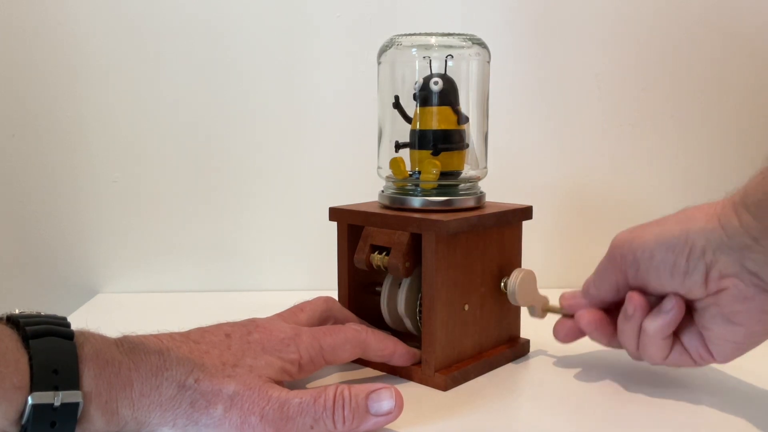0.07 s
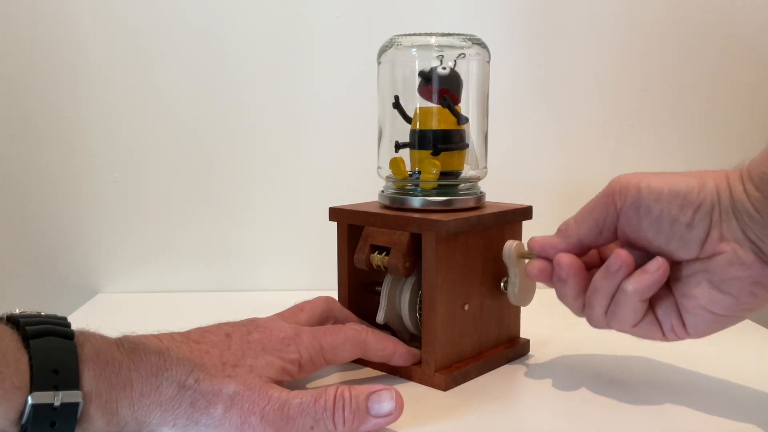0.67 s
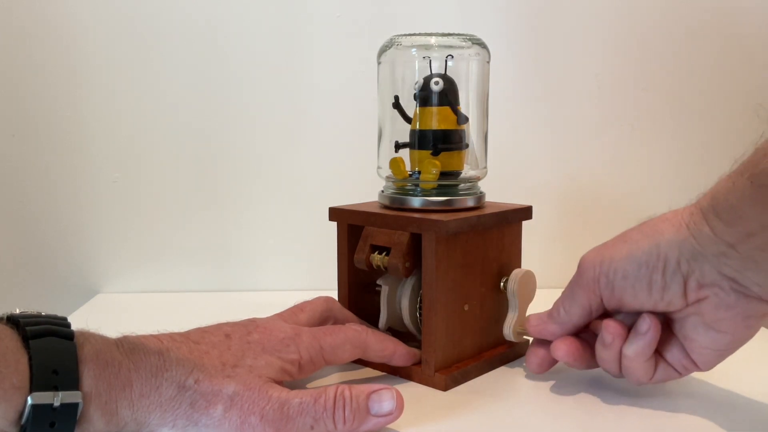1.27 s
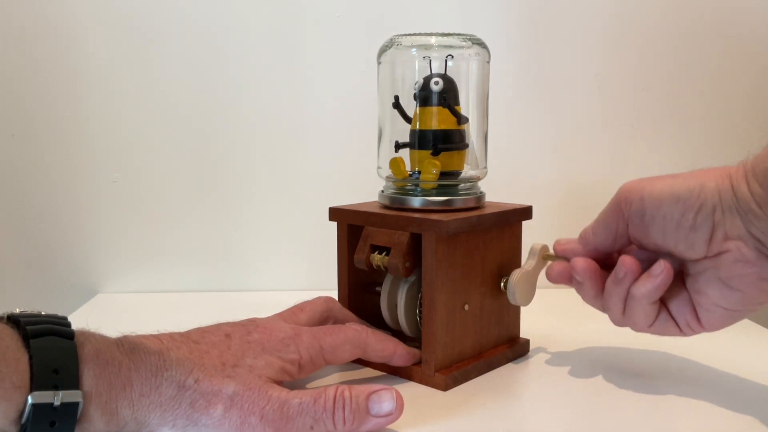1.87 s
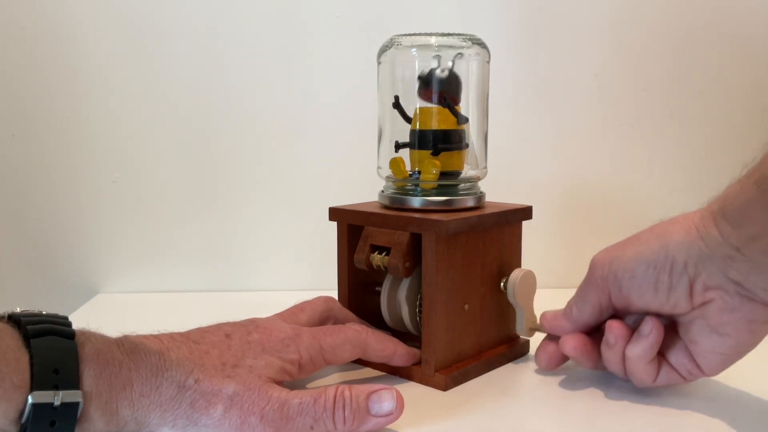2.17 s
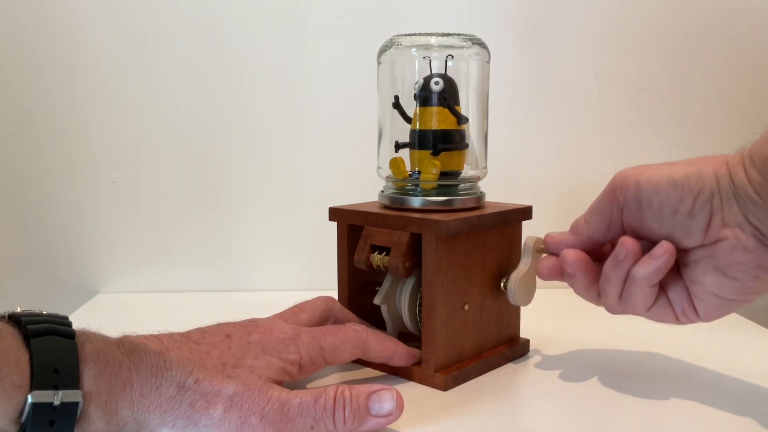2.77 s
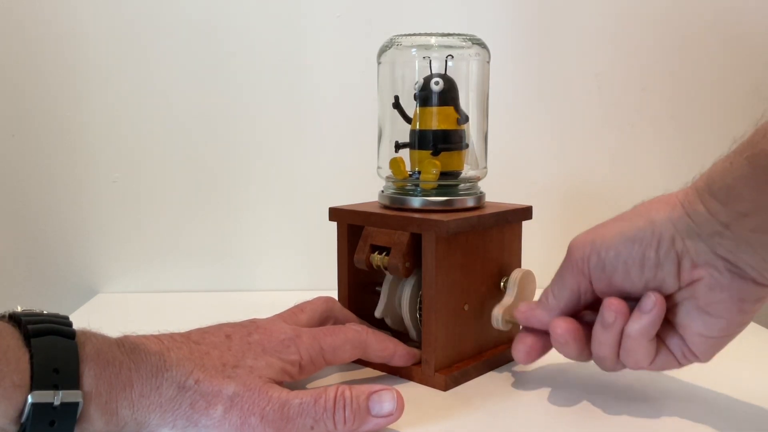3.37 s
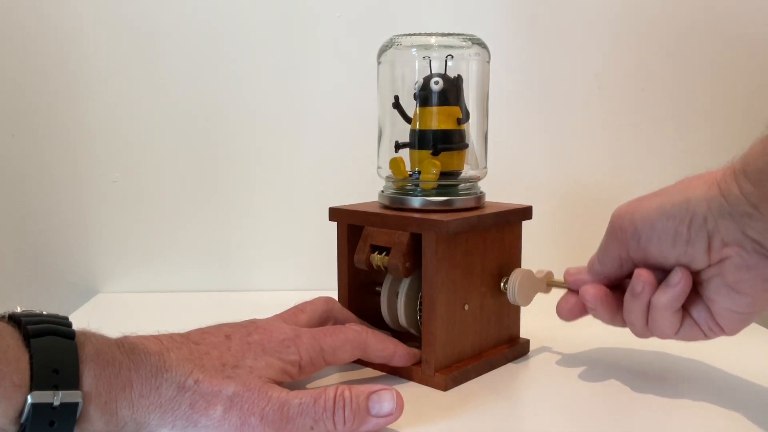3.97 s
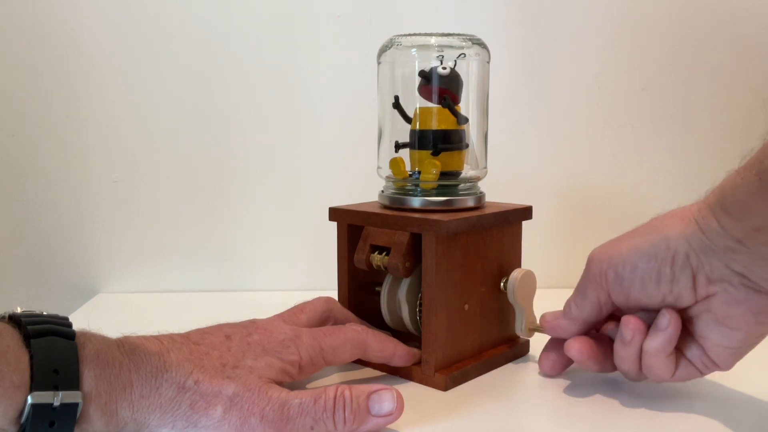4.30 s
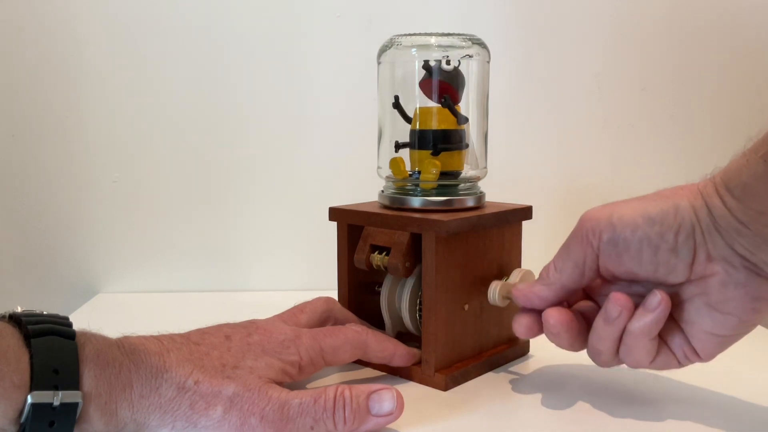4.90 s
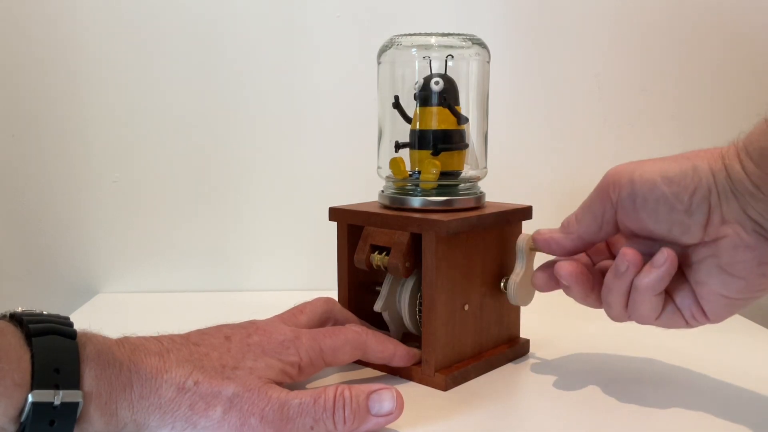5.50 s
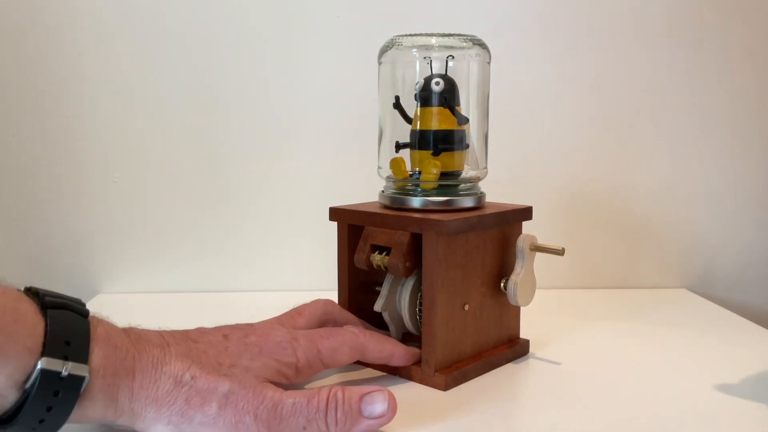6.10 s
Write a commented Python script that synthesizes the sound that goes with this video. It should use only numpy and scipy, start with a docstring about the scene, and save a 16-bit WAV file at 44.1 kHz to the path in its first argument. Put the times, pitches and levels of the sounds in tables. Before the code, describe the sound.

A hand-cranked wooden mechanism clacks in short runs, clinking against a glass jar, with duller claps and soft scraping in between.

```python
"""A table in a small room, one microphone close to a hand-cranked wooden automaton: a toy bee under a
glass jar, on a box of cams. First a follower clacks off its cam, thumping the box, and the bee's arm
strikes the jar. The head lifts with a scrape and claps shut. Twice a run of three clacks and clinks
follows, the shaft rubbing harder on each climb, and each run ends with another lift and clap. Before
the last clap the crank stalls and creeps on; then the hand lets go with a faint rustle."""
import sys
import numpy as np
from scipy import signal
from scipy.fft import rfft, irfft, next_fast_len
from scipy.io import wavfile
from scipy.ndimage import map_coordinates

SR = 44100
rng = np.random.default_rng(int(sys.argv[2]) if len(sys.argv) > 2 else 0)


def log_audio(samples):
    """Write samples as a 16-bit WAV file to the path given in sys.argv[1]."""
    # one column per channel
    frames = np.atleast_2d(samples).T
    # limit to full scale, then quantise
    limited = np.clip(frames, -1, 1)
    pcm = np.round(limited * 32767).astype(np.int16)
    wavfile.write(sys.argv[1], SR, pcm)


N = 275625
T = np.arange(SR // 2) / SR  # time within one blow, s


# followers drop: t/s, level/dB, relative box, wood and tip levels/dB, wood tilt/(dB/octave)
DROPS = [(0.0578, -6.5, -8.5, -15.5, -8, -1.5), (1.3785, -8.5, -6.5, -11.5, -20, 3.5),
         (1.714, -7.5, -7.5, -5, -13, -7), (2.0477, -6, -8.5, -11, -8.5, 6.5),
         (3.3758, -9, -6.5, -8.5, -6.5, 3.5), (3.71, -6.5, -11.5, -12, -6.5, 3),
         (4.0387, -5, -11.5, -12, -10, 9.5)]
# modes of a follower's wooden rod and of its hard tip: f/Hz, level/dB, t60/s
WOOD_MODES = [(1010, -9, .035), (1260, -6, .04), (1320, -11, .03), (2430, -3, .035), (2520, -3, .03),
              (2950, -7, .025), (3280, -10, .025)]
TIP_MODES = [(4150, -3, 0.018), (4840, 3, 0.014), (5400, 0.5, 0.018), (5880, -1, 0.028),
             (7630, -10.5, 0.03), (10800, -24.5, 0.13)]
# spectrum of a hard contact: f/Hz, level/dB
CRACK_SPECTRUM = [(150, -30), (550, -5), (750, -16), (1200, -2), (1900, -6.5), (2500, -3.5), (3700, -7.5),
                  (4600, -3), (5700, -4), (6900, -13.5), (7900, -8.5), (12000, -15), (15500, -21.5),
                  (17000, -40)]
def drops():
    """Followers snap down on the cams: the hard tip rings first, then the wooden rod."""
    out = np.zeros(N)
    for s, db, _, wood_db, tip_db, tilt_db in DROPS:
        crack = amp(-7) * burst(CRACK_SPECTRUM, t60=.034, attack=.00061)
        tip = amp(tip_db + 1) * ring(TIP_MODES, attack=.0003, detune=.027)
        rod = amp(wood_db + 4.5) * ring(WOOD_MODES, attack=.0013, tilt_db=tilt_db, detune=.011)
        add(out, s, amp(db) * in_room(crack + tip + rod, wet_db=-10.5))
    return out + thump([(s, db + box_db + 3.5) for s, db, box_db, *_ in DROPS])


# the arm strikes the jar: t/s, level/dB, relative box, low glass and top glass levels/dB
CLINKS = [(0.0843, -5, -19.5, -30, -26.5), (1.3982, -6, -26, -23, -34), (1.7392, -6, -29.5, -19, -33),
          (2.0776, -9.5, -24, -11.5, -23), (2.276, -39, -9, -21, -38), (3.3986, -6.5, -13.5, -24, -30),
          (3.7419, -9.5, -12, -17.5, -27), (3.932, -29.5, -20, -26, -19.5), (4.0715, -7, -11.5, -22, -36),
          (4.159, -36, -20, -20, -22)]
# the jar's main, low and top modes: f/Hz, level/dB, t60/s
JAR_MODES = [(3720, -4.5, 0.013), (9190, 1, 0.04), (9150, -24, 0.16), (9400, -6, 0.023)]
JAR_LOW_MODES = [(5870, -2, .1), (5745, -2, 0.25), (5840, -5.5, 0.098)]
JAR_TOP_MODES = [(14060, 0.0018, 0.1)]
def clinks():
    """The arm taps the jar; where it lands decides how much the low and the top modes ring."""
    out = np.zeros(N)
    for s, db, _, low_db, top_db in CLINKS:
        glass = amp(-5.5) * ring(JAR_MODES, attack=.0001, detune=.0005)
        crack = amp(-12.5) * burst(CRACK_SPECTRUM, t60=.028, attack=.0003)
        low = amp(low_db - 4) * ring(JAR_LOW_MODES, attack=.0003, detune=.00046)
        top = amp(top_db + 4) * ring(JAR_TOP_MODES, attack=.0003, detune=.0005)
        add(out, s, amp(db) * in_room(glass + crack + low + top, wet_db=-16))
    return out + thump([(s, db + box_db - 2.5) for s, db, box_db, *_ in CLINKS])


# the head shuts: t/s, level/dB, relative box level/dB
CLAPS = [(0.718, -10, -12.5), (2.691, -8.5, -9.5), (5.207, -9.5, -17)]
# modes of the hollow head: f/Hz, level/dB, t60/s
HEAD_MODES = [(1020, -8, .03), (1160, -5, .035), (1280, -3, .035), (1580, -4, .045), (2140, -11, .03),
              (2390, -6, .03), (2480, -4, .03), (2970, -3, .03), (3330, -8, .03), (5070, -10, .03),
              (6050, -13, .03), (6380, -15, .03), (7520, -17, .03), (8380, -21, .03)]
# spectrum of its closing faces: f/Hz, level/dB
CLAP_SPECTRUM = [(150, -1), (500, -9), (750, -5.5), (1200, 0.5), (1900, -7), (3000, -3), (3800, -11.5),
                 (6000, -16.5), (9000, -27), (15000, -50)]
def claps():
    """The hollow head shuts with a duller clack that shakes the jar; its chatter fills the room most."""
    out = np.zeros(N)
    for s, db, _ in CLAPS:
        chatter = amp(-5) * burst(CLAP_SPECTRUM, t60=.023, attack=.0016)
        shell = amp(-9) * ring(HEAD_MODES, attack=.0015, detune=.008)
        glass = amp(-19.5) * ring(JAR_MODES, attack=.0019, detune=.00041)
        glass += amp(-41) * ring(JAR_TOP_MODES, attack=.002, detune=.00062)
        at_mic = in_room(chatter, wet_db=-6) + in_room(shell + glass, wet_db=-13)
        add(out, s, amp(db) * at_mic)
    return out + thump([(s, db + box_db + 2) for s, db, box_db in CLAPS])


# modes of the box on the table: f/Hz, level/dB, t60/s
BOX_MODES = [(319, 1.5, .055), (366.7, -9.5, 0.14), (555, -15, 0.065), (113.75, -22, .4),
             (172, -22.5, 0.32), (217.8, -18, 0.26), (290.8, -21.5, 0.26), (454, -28.5, 0.34),
             (611, -34.5, 0.49)]
def thump(blows, lag_s=.004):
    """The box panels swing just after each blow (t/s, level/dB)."""
    out = np.zeros(N)
    for s, db in blows:
        panels = ring(BOX_MODES, attack=.0017, detune=.01)
        add(out, s + lag_s, amp(db) * in_room(panels, wet_db=-10))
    return out


# followers click: t/s, level/dB, relative box level/dB, head tilt/(dB/octave)
CLICKS = [(1.1007, -39.5, 11, 2), (1.2648, -22, -14, 5), (1.582, -16.5, -6.5, 6.5), (1.947, -15, -5.5, 9),
          (2.671, -23.5, 5, -7), (3.2612, -17, -14.5, 8), (3.6085, -15.5, -8, 5), (3.932, -19, -5, 10)]
# spectrum of a light contact: f/Hz, level/dB
CLICK_SPECTRUM = [(150, -18), (800, -11.5), (1300, -2), (1900, -6), (2450, 3), (3700, -3.5), (5100, 4.5),
                  (6100, -0.5), (6900, -1.5), (7500, 2), (11500, -10.5), (15500, -19.5)]
def clicks():
    """Followers shift in their guides; the rod carries the light click up into the bee."""
    out = np.zeros(N)
    for s, db, _, tilt_db in CLICKS:
        contact = amp(-2) * burst(CLICK_SPECTRUM, t60=.022, attack=.0046)
        shell = amp(-14) * ring(HEAD_MODES, attack=.00096, tilt_db=tilt_db)
        glass = amp(-22.5) * ring(JAR_MODES, attack=.001, detune=.0005)
        add(out, s, amp(db) * in_room(contact + shell + glass, wet_db=-8))
    return out + thump([(s, db + box_db - 1.5) for s, db, box_db, _ in CLICKS])


# loose parts knock: t/s, level/dB, relative box level/dB, tilt/(dB/octave)
KNOCKS = [(0.0014, -16, -6, 2.5), (0.025, -25.5, -6.5, -0.5), (0.1414, -19.5, -6.5, -4),
          (0.253, -26, -12, 1), (0.3787, -30.5, 1, 3.5), (1.3256, -26, 1, -3), (1.6324, -26, -3.5, -4),
          (1.9864, -18, -16.5, -0.5), (2.1489, -20, 0.5, 0.5), (2.2769, -26.5, -10, 0.5),
          (2.4024, -34.5, -1, -0.5), (3.3077, -34, 3, -2.5), (3.6487, -21, -3, 0),
          (3.9742, -20.5, -1.5, 0.5), (4.1582, -25, 0, 0.5), (4.4108, -44.5, -1, -4.5),
          (4.7527, -49, -6, -3.5), (4.8187, -34.5, 2.5, 1), (5.096, -44.5, 6, -2.5), (6.0497, -54, 0, -1.5)]
def knocks():
    """Loose rods settle with soft wooden knocks that reach the box."""
    out = np.zeros(N)
    for s, db, _, tilt_db in KNOCKS:
        add(out, s, amp(db) * knock(tilt_db))
    return out + thump([(s, db + box_db - 1.5) for s, db, box_db, _ in KNOCKS])


# spectrum of a soft contact: f/Hz, level/dB
KNOCK_SPECTRUM = [(150, -27), (500, 7), (750, -1.5), (1300, 5.5), (1900, -4.5), (2500, 3), (3700, -11),
                  (5200, -9), (9000, -24), (15000, -33)]
def knock(tilt_db):
    """One soft contact of wood on wood; a harder one is brighter."""
    spectrum = [(hz, db + tilt_db * np.log2(hz / 2000)) for hz, db in KNOCK_SPECTRUM]
    contact = amp(-3) * burst(spectrum, t60=.044, attack=.003)
    rod = amp(-11) * ring(WOOD_MODES, attack=.00038, tilt_db=tilt_db)
    return in_room(contact + rod, wet_db=-8)


# resonances of the box under steady rubbing: f/Hz, width/Hz, level/dB
GROAN_BANDS = [(124.5, 12, -1.5), (170.5, 13, -5), (221, 14, -7), (285.5, 17, 5), (360, 41, -10.5),
               (400, 13, -22), (410, 4, -17.5), (580, 23, -12)]
# spectra of the cam faces' scrape and fine hiss: f/Hz, level/dB
SCRAPE_SPECTRUM = [(400, -19), (750, -8.5), (1000, 4.5), (1300, 6), (1600, 2.5), (1850, -12.5), (2450, 1.5),
                   (3100, -11.5), (3900, -16), (5300, -17.5), (7000, -31.5), (15000, -53)]
CAM_HISS_SPECTRUM = [(2000, -19.5), (3200, -3), (4000, -0.5), (5200, 0.5), (6100, -1), (7000, -9.5),
                     (8200, -7), (10000, -15), (15000, -23)]
def shaft():
    """Wood sticks and slips on wood: the box groans, and the cam faces scrape in small grains."""
    def panels(hz):
        bands = sum(amp(db) * 1j * hz * width / (centre ** 2 - hz ** 2 + 1j * hz * width)
                    for centre, width, db in GROAN_BANDS)
        low_pass = 1 / (1 + (hz / 640) ** 12)
        high_pass = hz ** 2 / (hz ** 2 + 70 ** 2)
        return bands * low_pass * high_pass

    groan_gain, scrape_gain, hiss_gain = friction()
    slips = rng.standard_normal(N) * amp(3 * wobble(60))
    groan = groan_gain * unit(filtered(slips, panels))
    grains = unit(amp(3 * wobble(50) + 3.5 * wobble(350)))
    scrape = scrape_gain * noise(SCRAPE_SPECTRUM, N)
    hiss = hiss_gain * noise(CAM_HISS_SPECTRUM, N)
    return groan + in_room(grains * (scrape + hiss), wet_db=-8.5)


# the hand's effort on the crank, stalling near 4.4 s: t/s, groan level/dB
EFFORT = [(0, -39), (.36, -39.5), (.5, -45.5), (.85, -44.5), (1.06, -40), (1.22, -58), (1.95, -47),
          (2.3, -40.5), (2.48, -44.5), (2.6, -38.5), (2.87, -55), (2.98, -40), (3.15, -51), (3.27, -45),
          (3.55, -50.5), (4.2, -51), (4.37, -75), (4.43, -58.5), (4.55, -49), (4.73, -54), (4.88, -43.5),
          (4.97, -56), (5.04, -46), (5.17, -43.5), (5.45, -71), (5.6, -98.5)]
# a cam lifts the head before each clap: start t/s, scrape level at easy effort/dB
LIFTS = [(.2, -62.5), (2.2, -63), (4.385, -60)]
def friction(easy_db=-44):
    """Groan, scrape and hiss follow effort and climbs; the lifted head scrapes more and hisses less."""
    effort_db, = curves(EFFORT)
    push_db = effort_db - easy_db
    climb = cam_load(DROPS, rise_s=.19)
    edge = cam_load(CLAPS, rise_s=.045)  # the head's rod nears the cam's edge
    lifts = head_lifts()
    lifted = lifts.sum(axis=0)
    easy_scrape = amp(-72) * (1 - lifted) + amp([db for _, db in LIFTS]) @ lifts
    easy_hiss = amp(-78.5) * (1 - lifted) + amp(-87) * lifted
    groan = amp(effort_db) + amp(-41.5) * climb
    scrape = amp(push_db) * easy_scrape + amp(-49.5) * climb
    hiss = amp(1.3 * push_db) * easy_hiss + amp(-65) * climb + amp(-60) * edge
    return groan, scrape, hiss


def cam_load(events, rise_s):
    """A follower's load, 0-1: it builds up to each event, then falls away."""
    return sum(gate(s - rise_s, s, rise_s, fall_s=.17) for s, *_ in events) ** 2


def head_lifts():
    """One 0-1 curve for each lift: 1 while the cam holds the head open."""
    return np.array([gate(start, shut, rise_s=.012, fall_s=.04)
                     for (start, _), (shut, *_) in zip(LIFTS, CLAPS)])


def rattle(per_s=12, slots=256, scatter_db=2):
    """The rod holding the head open chatters on its cam at random, louder with more effort."""
    effort_db, = curves(EFFORT)
    lifted = head_lifts().sum(axis=0)
    out = np.zeros(N)
    for slot, (place, chance, softness) in enumerate(rng.random((slots, 3))):
        at = int((slot + place) * N / slots)
        if chance < lifted[at] * per_s * N / SR / slots:
            db = effort_db[at] - 1 - scatter_db * (2 * softness - 1)
            add(out, at / SR, amp(db) * knock(tilt_db=-1))
    return out


# a cam tooth catches: t/s, level/dB
TICKS = [(0.3077, -46.5), (1.3283, -37.5), (1.5229, -39), (2.682, -27), (3.249, -49), (3.6558, -33.5)]
# spectrum of its edge: f/Hz, level/dB
TICK_SPECTRUM = [(1000, -32), (3000, -4.5), (6000, -3), (9000, -1.5), (15000, -9)]
def ticks():
    """Tooth edges catch and let go, too lightly to move the box."""
    out = np.zeros(N)
    for s, db in TICKS:
        tick = burst(TICK_SPECTRUM, t60=.025, attack=.0004)
        add(out, s, amp(db - 5.5) * in_room(tick, wet_db=-10))
    return out


def scuffs(lead_s=.0055):
    """Followers and head slide off their edges a moment before they land."""
    out = np.zeros(N)
    for s, db, *_ in [*DROPS, *CLAPS]:
        add(out, s - lead_s, amp(db - 37.5) * burst(CLICK_SPECTRUM, t60=.013, attack=.0051))
    return out


# the hand moves away: t/s, bump level/dB, rustle level/dB
HAND_AWAY = [(6.04, -100, -110), (6.055, -59, -98.5), (6.10, -57, -93), (6.11, -62, -69.5),
             (6.19, -65.5, -55), (6.25, -55.5, -68)]
# spectra of the bump, the rustle and the room's air: f/Hz, level/dB
BUMP_SPECTRUM = [(30, -25), (65, -2), (115, 5), (200, -11), (400, -21), (900, -49.5)]
RUSTLE_SPECTRUM = [(200, -1.5), (450, 6.5), (750, -9.5), (1400, 1.5), (1800, -8), (3000, -2), (6000, -3.5),
                   (10000, -9.5), (16000, -13)]
AIR_SPECTRUM = [(25, -7.5), (70, -1), (130, 3), (300, -2.5), (600, -10), (1500, -9.5), (3000, -12.5),
                (6000, -16), (10000, -18.5), (16000, -24)]
def background():
    """Room tone, and a soft bump and rustle once the crank is let go."""
    bump_db, rustle_db = curves(HAND_AWAY)
    bump = amp(bump_db) * noise(BUMP_SPECTRUM, N)
    rustle = amp(rustle_db + 1.5 * wobble(110)) * noise(RUSTLE_SPECTRUM, N)
    return bump + rustle + amp(-82) * noise(AIR_SPECTRUM, N)


# decay of the small room: f/Hz, t60/s
ROOM_DECAY = [(100, 0.57), (400, 0.43), (1300, 0.35), (3000, 0.32), (6000, 0.32), (10000, .27),
              (15000, 0.35)]
def in_room(x, wet_db, build_s=.0067):
    """The direct sound at the microphone plus the walls' answer, which lasts longest in the bass."""
    hz, t, spectra = signal.stft(rng.standard_normal(len(T)), SR, nperseg=256)
    decay = amp(-60 * t / along(ROOM_DECAY, hz)[:, None])
    tail = signal.istft(spectra * decay, SR, nperseg=256)[1][:len(T)]
    tail *= 1 - np.exp(-(T / build_s) ** 2)
    tail /= np.linalg.norm(tail)
    return x + amp(wet_db) * signal.fftconvolve(x, tail)[:len(x)]


def ring(modes, attack, tilt_db=0, scatter_db=2.5, detune=.0033):
    """Damped modes, tilted in dB per octave about 2 kHz; each blow lands a little differently."""
    chance = rng.standard_normal((len(modes), 3))
    out = np.zeros(len(T))
    for (hz, db, t60), (louder, sharper, phase) in zip(modes, chance):
        octaves = np.log2(hz / 2000)
        wave = np.sin(2 * np.pi * hz * (1 + detune * sharper) * T + np.pi * phase)
        out += amp(db + tilt_db * octaves + scatter_db * louder) * fade(t60, attack) * wave
    return out


def burst(spectrum, t60, attack):
    """The brief chatter of two hard faces meeting."""
    return noise(spectrum, len(T)) * fade(t60, attack)


def fade(t60, attack):
    """A quick rise and an exponential decay (times in s)."""
    return amp(-60 * T / t60) * (1 - np.exp(-T / attack))


def gate(start, end, rise_s, fall_s):
    """Rises to 1 after start, holds, and falls to 0 after end."""
    t = np.arange(N) / SR
    return np.clip((t - start) / rise_s, 0, 1) * np.clip(1 - (t - end) / fall_s, 0, 1)


def noise(spectrum, size):
    """Coloured noise of rms 1."""
    return unit(filtered(rng.standard_normal(size), lambda hz: amp(along(spectrum, hz))))


def filtered(x, response):
    """x through a complex frequency response."""
    size = next_fast_len(len(x) + SR // 2)
    return irfft(rfft(x, size) * response(np.fft.rfftfreq(size, 1 / SR)), size)[:len(x)]


def wobble(rate):
    """A smooth random curve, rate knots a second."""
    knots = rng.standard_normal(int(N * rate / SR) + 4)
    return map_coordinates(knots, [np.arange(N) * rate / SR])


def curves(rows):
    """One value per sample for each column after the time."""
    times, *columns = np.transpose(rows)
    return [np.interp(np.arange(N) / SR, times, column) for column in columns]


def along(points, hz):
    """(f/Hz, value) points read on a log axis."""
    freqs, values = np.transpose(points)
    return np.interp(np.log(hz + 1), np.log(freqs + 1), values)


def add(track, s, sound):
    """Mix a sound into the track at s seconds."""
    start = max(round(s * SR), 0)
    part = sound[:max(len(track) - start, 0)]
    track[start:start + len(part)] += part


def amp(db):
    """Decibels to gain."""
    return 10 ** (np.asarray(db) / 20)


def unit(x):
    """x at rms 1."""
    return x / np.sqrt(np.mean(x ** 2) + 1e-20)


def scene():
    """The whole mechanism in mono, from close by."""
    contacts = drops() + clinks() + claps() + clicks() + knocks() + ticks() + scuffs()
    return (contacts + shaft() + background() + rattle())[None]


def record(dry, ceiling=.62, low_cut_hz=67, top_hz=16200):
    """The recorder rounds off the highest peaks, sheds deep bass and cuts the extreme treble."""
    rounded = dry[0] / (1 + np.abs(dry[0] / ceiling) ** 6) ** (1 / 6)
    low_cut = signal.butter(4, low_cut_hz, "highpass", fs=SR, output="sos")
    lean = signal.sosfilt(low_cut, rounded)
    return filtered(lean, lambda hz: 1 / (1 + (hz / top_hz) ** 120))[None]


dry = scene()
out = record(dry)
log_audio(out)
```